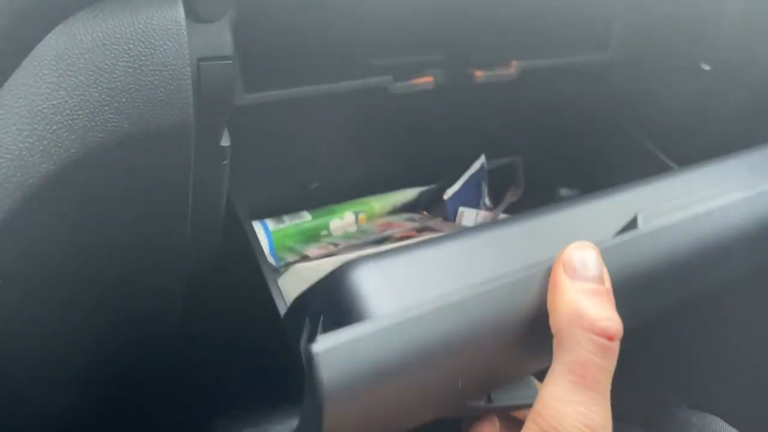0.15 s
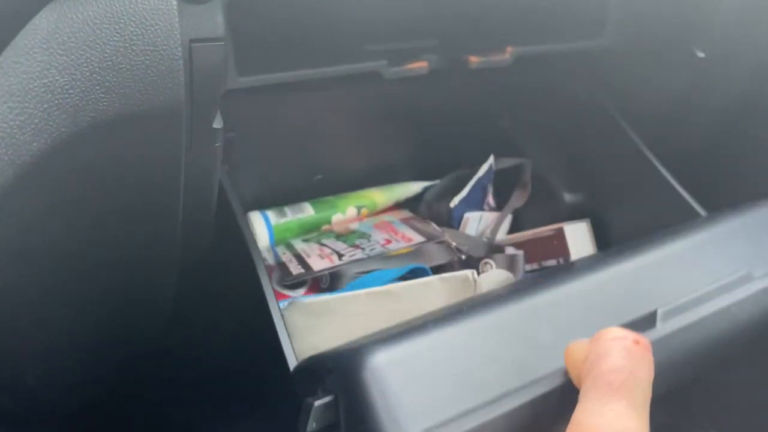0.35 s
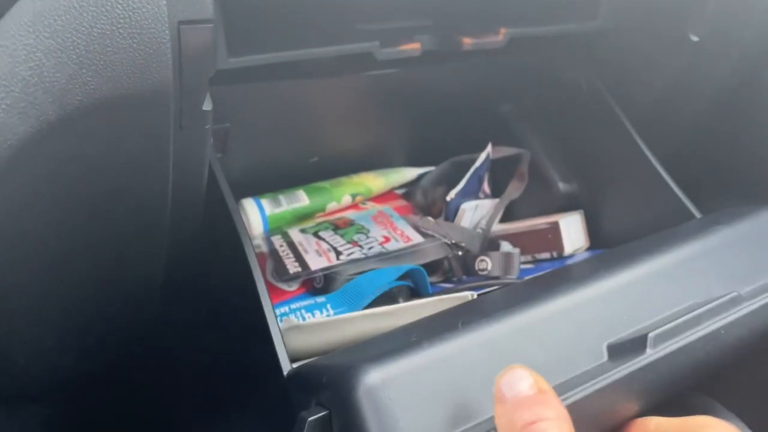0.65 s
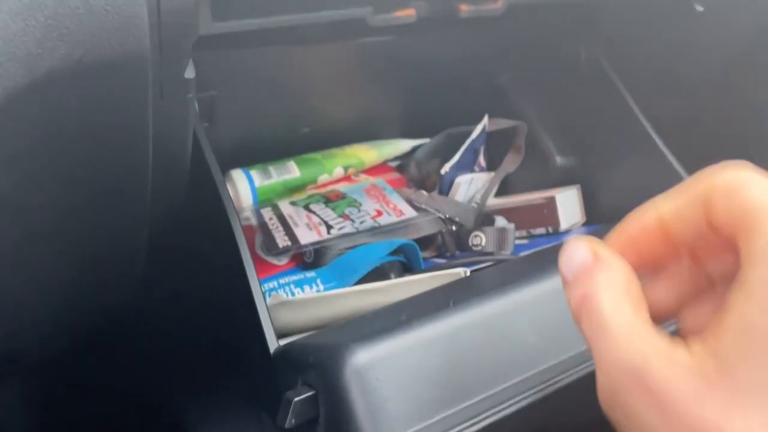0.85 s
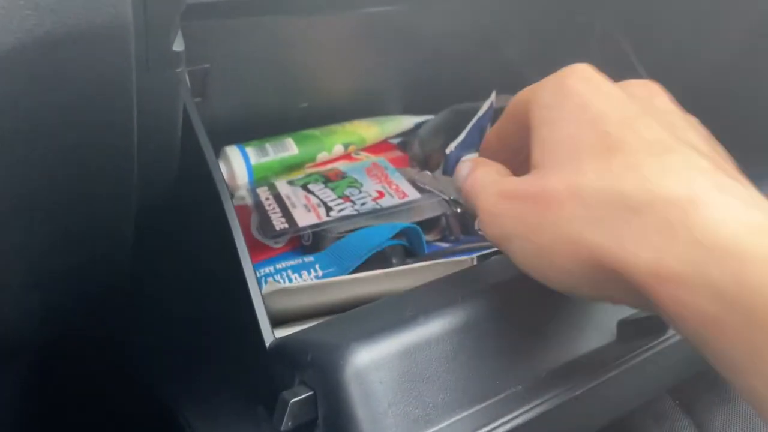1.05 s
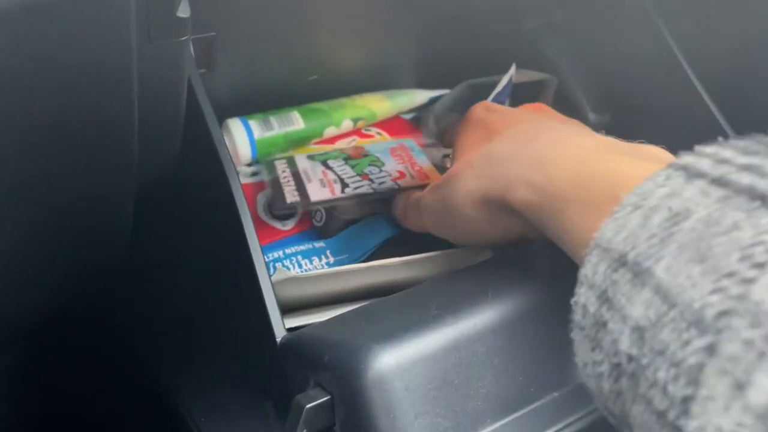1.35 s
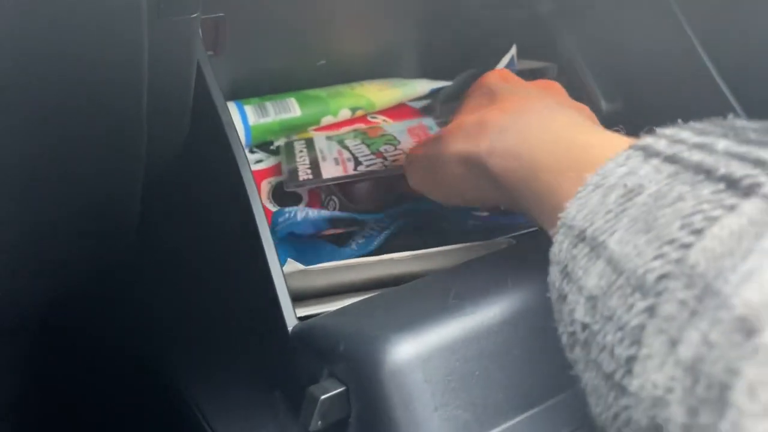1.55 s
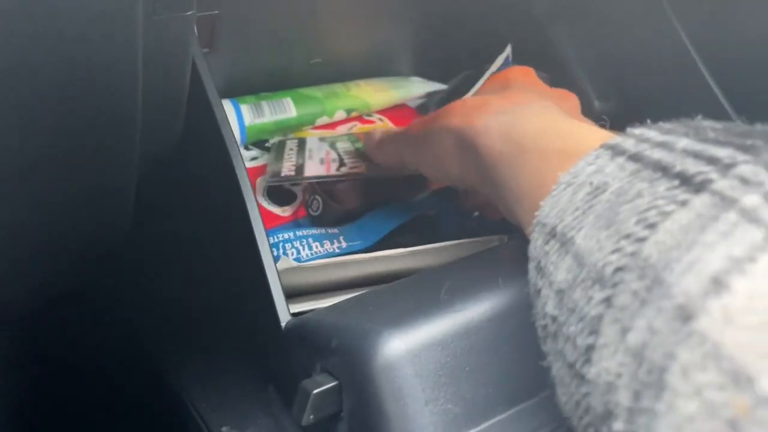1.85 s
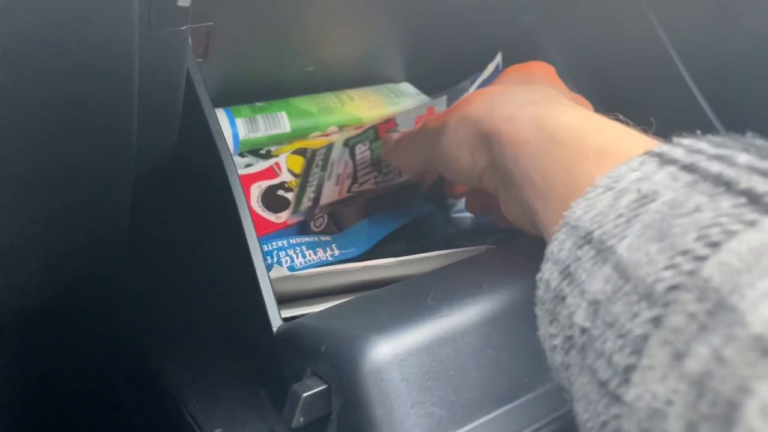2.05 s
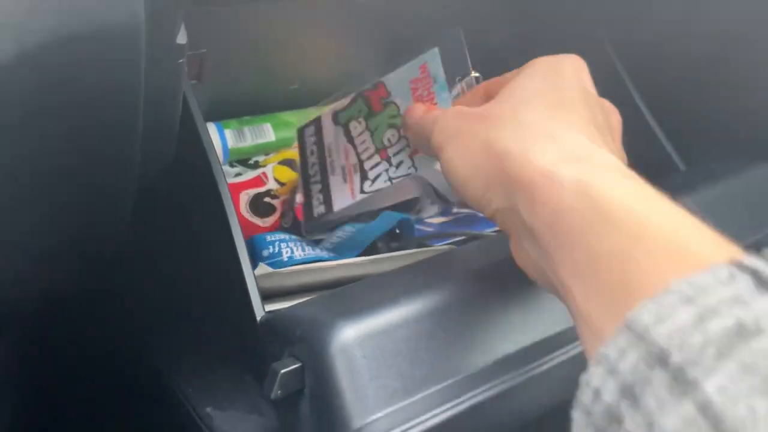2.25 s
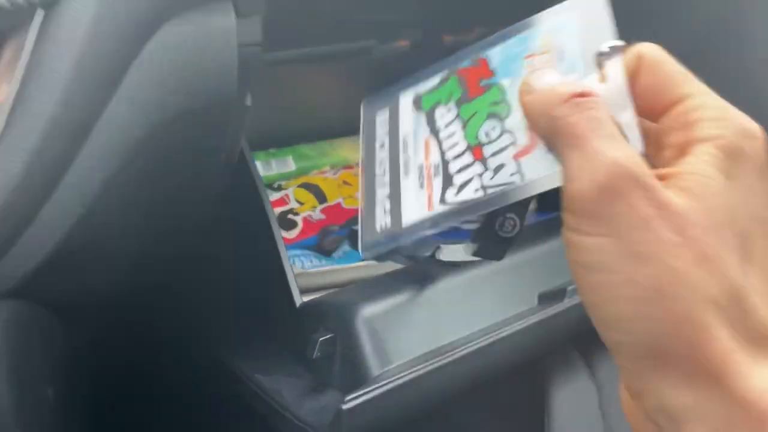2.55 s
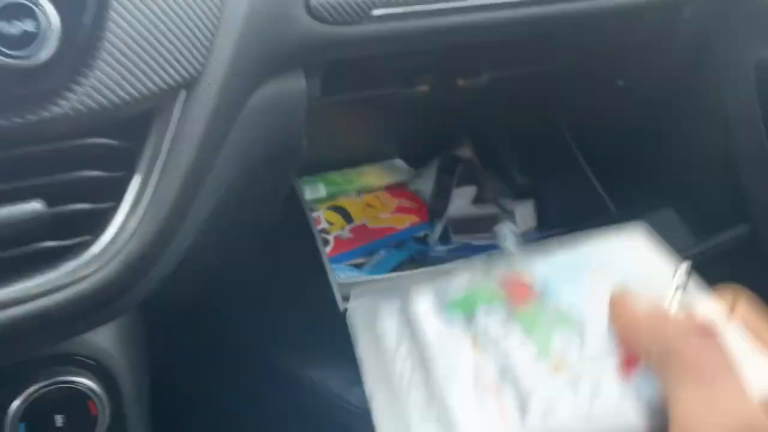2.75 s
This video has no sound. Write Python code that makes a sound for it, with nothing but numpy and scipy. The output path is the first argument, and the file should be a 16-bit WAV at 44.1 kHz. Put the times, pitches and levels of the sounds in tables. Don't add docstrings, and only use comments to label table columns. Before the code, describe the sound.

Inside a damped car cabin, a plastic glove box lid knocks onto its stop and bounces with a dull thump; soft bumps, card slides and crisp snaps follow, heard close over low boom and faint motor hum.

```python
import sys
import numpy as np
from scipy import signal
from scipy.fft import rfft, irfft, next_fast_len
from scipy.io import wavfile
from scipy.ndimage import uniform_filter1d, map_coordinates

SR = 44100
rng = np.random.default_rng(int(sys.argv[2]) if len(sys.argv) > 2 else 0)


def generate_wav(signal):
    frames = np.transpose(np.atleast_2d(signal))
    scaled = np.clip(frames, -1, 1) * 32767
    pcm = np.round(scaled).astype(np.int16)
    wavfile.write(sys.argv[1], SR, pcm)


def amplitude_ratio(level_db):
    exponent = np.asarray(level_db, float) / 20
    return 10 ** exponent


N = 127890


def unit(x):
    return x / np.sqrt(np.mean(x ** 2) + 1e-20)


def along(points, hz):
    f, v = np.transpose(points)
    return np.interp(np.log(hz + 1), np.log(f + 1), v)


def curves(rows):
    s, *cols = np.transpose(rows)
    return [np.interp(np.arange(N) / SR, s, c) for c in cols]


def wobble(rate):
    knots = rng.standard_normal(int(N * rate / SR) + 4)
    return map_coordinates(knots, [np.arange(N) * rate / SR])


def filtered(x, response):
    m = next_fast_len(N + SR // 2)
    return irfft(rfft(x, m) * response(np.fft.rfftfreq(m, 1 / SR)), m)[..., :N]


def coloured(x, response):
    n = x.shape[-1]
    return irfft(rfft(x, 2 * n) * response(np.fft.rfftfreq(2 * n, 1 / SR)))[..., :n]


def add(track, s, sound):
    part = track[..., round(s * SR):][..., :sound.shape[-1]]
    part += sound[..., :part.shape[-1]]


def ring(modes, t):
    partials = sum(amplitude_ratio(db - 60 * t / t60) * np.sin(2 * np.pi * hz * t) for hz, db, t60 in modes)
    return partials * (1 - np.exp(-t / 0.00053))


def peak(f, hz, width):
    return np.exp(-(np.log((f + 1) / hz) / width) ** 2)


def pair(shape):
    common, left, right = rng.standard_normal((3, *shape))
    share = 0.64
    return share ** .5 * common + (1 - share) ** .5 * np.array([left, right])


def dying(decay, length):
    hz, t, z = signal.stft(pair((length,)), SR, nperseg=128)
    return signal.istft(z * amplitude_ratio(-60 * t / along(decay, hz)[:, None]), SR, nperseg=128)[1]


# start in seconds, ring in dB, tilt in dB per octave, crack in dB.
STOP = [
    (.3215, -29.5, 10, -12.5),
    (.3245, -20.5, 2.5, -13.5),
    (.3287, -18.5, -9.5, -20),
    (.4245, -29.5, 2, -23.5),
    (.4285, -29, -9.5, -30),
]
# start in seconds, ring in dB, tilt in dB per octave, crack in dB.
REBOUND = [
    (.4365, -17.5, 0.019, -23),
]
# pitch in Hz, level in dB, t60 in seconds.
LID = [(242, -19.5, 0.034), (383, 6, 0.079), (410, -13, 0.013), (524, 7, 0.042), (622, 3, 0.041),
       (720, 3, 0.045), (973, -3, 0.044), (1150, -1.5, 0.052), (1350, -3.5, 0.025), (1560, -5, 0.044),
       (1923, -2.5, 0.025), (2530, -2, 0.0097)]
# pitch in Hz, level in dB, t60 in seconds.
BIN = [(59.9, -3, 0.27), (79.2, -7.5, 0.63), (117, 4, 0.12), (182, -6, 0.18), (270, -4.5, 0.1),
       (327, -8, 0.18), (356, -2.5, .08)]
# frequency in Hz, level in dB.
CRACK = [(150, -23.5), (600, 4), (2000, -6.5), (4000, -18.5), (8000, -24.5), (16000, -29.5)]
# frequency in Hz, t60 in seconds.
CRACK_DIES = [(400, 0.036), (2000, 0.055), (4000, 0.067), (12000, 0.014)]


def blows(rows, modes, smear):
    out, t = np.zeros((2, N)), np.arange(SR // 3) / SR
    pan_db = -5
    for s, db, tilt_db, crack_db in rows:
        crack = coloured(dying(CRACK_DIES, SR // 6), lambda f: amplitude_ratio(along(CRACK, f)))
        rough = 1 + smear * wobble(305)[:len(t)]
        for ch, side in enumerate((.5, -.5)):
            lean_db = side * pan_db
            add(out[ch], s, amplitude_ratio(crack_db + lean_db) * crack[ch])
            struck = []
            for hz, level, t60 in modes:
                tilt = tilt_db * np.log2(hz / 500)
                struck.append((hz, level + tilt + lean_db * min(hz / 350, 1), t60))
            add(out[ch], s + ch * .0001, amplitude_ratio(db - 4) * ring(struck, t) * rough)
    return out


def lid():
    return blows(STOP, LID, 0.49) + blows(REBOUND, BIN, 0)


# pitch in Hz, level in dB, t60 in seconds.
SQUEAK = [
    (1090, -39.5, 0.066),
    (1310, -41, 0.06),
]


def squeak():
    out, t = np.zeros((2, N)), np.arange(SR // 8) / SR
    add(out, .158, ring(SQUEAK, t) * (1 - np.exp(-t / 0.0011)))
    return ports(out)


# start in seconds, peak in dB, pitch in Hz, t60 in seconds,
# tilt in dB per octave.
TICKS = [(0.1451, -39, 11860, 0.1, -3), (0.1663, -29.5, 1010, 0.0516, -6), (0.2872, -38, 2100, 0.13, -3.5),
         (0.7173, -30.5, 2786, .05, -4), (0.7194, -36, 1310, 0.074, -4.5),
         (1.1571, -33.5, 1236, 0.032, -3.5), (1.1595, -37, 1575, .05, -3), (1.2142, -44.5, 1650, 0.047, 2),
         (1.2736, -42.5, 2240, 0.03, 1.5), (1.318, -40, 1150, 0.05, -7.5),
         (1.3423, -40.5, 4200, 0.084, -9.5), (1.3502, -36, 1090, 0.034, -0.5),
         (1.482, -40.5, 4200, 0.031, -2), (1.533, -57.5, 2680, 0.041, -9), (1.6734, -59, 1350, 0.042, 4),
         (1.8772, -48.5, 980, 0.086, 1), (1.9614, -58, 1960, .05, -5), (1.9664, -34.5, 1530, .05, -4.5),
         (2.077, -35.5, 1110, 0.043, -3), (2.1565, -49.5, 2260, 0.062, -5), (2.374, -30.5, 2750, 0.056, -3),
         (2.3779, -33, 4260, 0.019, 1.5), (2.3938, -27.5, 6560, 0.035, 4), (2.3934, -31, 2730, 0.04, 0),
         (2.4116, -40, 6250, 0.091, 0), (2.45, -48, 6530, 0.019, 1), (2.4547, -47, 3550, 0.047, 2.5),
         (2.575, -43, 2810, 0.069, 2.5), (2.5974, -37.5, 11400, .07, -10),
         (2.6705, -40.5, 4500, 0.026, -1.5), (2.7256, -41.5, 1794, 0.026, 1),
         (2.8364, -51.5, 2820, 0.062, 1.5), (2.8753, -46, 11400, 0.045, 2), (2.8914, -27.5, 5990, 0.033, 1)]
# frequency in Hz, level in dB.
SNAP = [(300, 5.5), (1500, 3), (6000, -2.5), (12000, -6), (16000, -13.5)]


def ticks():
    out, t = np.zeros((2, N)), np.arange(SR // 8) / SR
    rise = 1 - np.exp(-t / 0.0012)
    spike = 1 + amplitude_ratio(-8) * np.exp(-t / 0.0027)
    for s, db, hz, t60, tilt_db in TICKS:
        def shape(f):
            tilt = tilt_db * np.log2((f + 1) / 2500)
            return amplitude_ratio(along(SNAP, f) + tilt + 9 * peak(f, hz, 0.24))
        burst = amplitude_ratio(-60 * t / t60) * spike * unit(coloured(pair(t.shape), shape))
        tone = ring([(hz, -13, t60)], t)
        add(out, s, amplitude_ratio(db - 3) * rise * (burst + tone))
    return ports(out)


# start in seconds, peak in dB, low mode in Hz, high mode in Hz,
# high over low in dB.
BUMPS = [(.042, -51, 332, 530, -16), (.599, -41, 334, 577, 4), (.954, -45.5, 198.3, 260, 10.5),
         (1.161, -46, 405, 1235, 0), (1.345, -45, 407, 670, -4), (1.382, -37.5, 216, 450, -1),
         (1.465, -44, 195, 260, -14), (1.671, -54.5, 653, 1105, 5), (1.771, -61, 780, 980, 1),
         (1.815, -57, 790, 1000, 2), (1.884, -53.5, 730, 495, -1), (1.961, -52.5, 650, 990, -13),
         (1.978, -49.5, 800, 600, 4), (2.185, -66, 785, 1100, 9), (2.394, -48.5, 337, 680, 11),
         (2.449, -51, 550, 720, -15)]


def bumps():
    out, t = np.zeros((2, N)), np.arange(SR // 8) / SR
    t60 = 0.074
    for s, db, hz, high_hz, high_db in BUMPS:
        modes = [(hz, 0, t60), (high_hz, high_db, t60 * 0.38)]
        puff = unit(coloured(pair(t.shape), lambda f: f / hz / (1 + (f / (1.09 * high_hz)) ** 4)))
        puff = puff * amplitude_ratio(-3 - 75 * t / t60)
        add(out, s, amplitude_ratio(db + 5) * (ring(modes, t) + puff) * (1 - np.exp(-t / 0.0009)))
    return ports(out)


# centre in seconds, half length in seconds, level in dB,
# resonance in Hz, its width in log Hz.
STROKES = [(0.405, 0.035, -63.5, 2200, 0.45), (0.477, 0.029, -54.5, 960, 0.67),
           (0.554, 0.022, -62.5, 5270, .3), (0.679, 0.044, -59.5, 2500, 0.18),
           (1.268, 0.028, -55.5, 11600, 0.12), (1.423, 0.022, -61.5, 3500, 0.41),
           (1.588, 0.031, -63, 3500, 0.14), (1.894, 0.008, -61, 4530, .3), (2.117, 0.069, -68, 2450, 0.1),
           (2.19, 0.051, -57, 3000, .1), (2.203, 0.04, -62, 10200, .2), (2.314, 0.033, -65, 5500, 0.3),
           (2.588, 0.015, -70.5, 14000, 0.14), (2.733, 0.048, -56.5, 5940, 0.33),
           (2.769, 0.036, -60, 10900, 0.39)]
# frequency in Hz, level in dB per Hz.
RUSTLE = [(150, -18), (400, -2.5), (1000, -8.5), (2000, -11.5), (4500, -15), (9000, -22), (13000, -20),
          (15000, -18.5)]


def strokes():
    out = np.zeros((2, N))
    t = np.arange(SR // 4) / SR - 1 / 8
    for s, half, db, hz, width in STROKES:
        hiss = coloured(pair(t.shape), lambda f: amplitude_ratio(along(RUSTLE, f) + 13 * peak(f, hz, width)))
        add(out, s + t[0], amplitude_ratio(db) * np.exp(-(t / half) ** 2) * unit(hiss))
    return ports(out)


# time in seconds, level in dB.
HAND = [(0, -72), (.16, -60.5), (.37, -59.5), (.43, -47), (.6, -64.5), (.69, -53.5), (.84, -80),
        (1.14, -66), (1.27, -54), (1.5, -58), (1.72, -69), (1.865, -65), (1.88, -60), (2.17, -62),
        (2.3, -63.5), (2.5, -63), (2.76, -57), (2.79, -66)]


def rustle():
    db, = curves(HAND)
    grain_db = 3.5 * np.minimum(rng.exponential(size=N), 3)
    sparks = (rng.random(N) < 110 / SR) * amplitude_ratio(grain_db)
    grains = unit(np.convolve(sparks, np.exp(-np.arange(500) / 110))[:N])
    z = signal.stft(pair((N,)), nperseg=256)[2]
    patches = uniform_filter1d(rng.standard_normal(z.shape[1:]), size=3, axis=0)
    patches = uniform_filter1d(patches, size=5, axis=1)
    hiss = signal.istft(z * amplitude_ratio(2 * unit(patches)), nperseg=256)[1][:, :N]
    hiss = unit(filtered(hiss, lambda f: amplitude_ratio(along(RUSTLE, f))))
    flutter_db = 1.5 * wobble(25.63)
    return ports(amplitude_ratio(db + flutter_db) * (1 + amplitude_ratio(-9) * grains) * hiss)


# frequency in Hz, t60 in seconds.
CABIN = [(200, 0.095), (2000, 0.032), (10000, 0.054)]


def cabin(x):
    tail = dying(CABIN, SR // 4)
    return signal.fftconvolve(x, tail / np.linalg.norm(tail[0]), axes=1)[:, :N]


# centre in seconds, half width in seconds, level in dB.
BOOM = [(.07, 0.023, -38.5), (0.297, 0.071, -28.5), (0.474, 0.067, -28), (0.698, 0.043, -34.5),
        (.93, 0.031, -41), (1.037, 0.07, -29.5), (1.192, 0.013, -31), (1.458, 0.054, -33),
        (1.66, 0.036, -41), (1.82, 0.074, -27), (1.979, 0.019, -36.5), (2.08, 0.03, -38.5),
        (2.21, 0.073, -36.5), (2.42, 0.037, -39.5), (2.546, 0.039, -26.5), (2.639, 0.03, -31),
        (2.74, 0.027, -42), (2.9, 0.017, -39)]
# time in seconds, pitch in Hz.
BOOM_HZ = [(0.0, 51.02), (0.19, 48.83), (0.44, 64.68), (0.57, 62.12), (0.65, 56.69), (0.93, 54.43),
           (1.19, 54.25), (1.26, 57.4), (1.57, 57.83), (1.68, 51.1), (2.01, 52.47), (2.11, 57.05),
           (2.24, 53.9), (2.39, 54.35), (2.49, 54.9), (2.66, 55.2), (2.79, 41.5), (2.9, 42)]


def boom():
    t = np.arange(N) / SR
    swell = amplitude_ratio(-44.5) + sum(amplitude_ratio(db - 1) * np.exp(-((t - s) / half) ** 2) for s, half, db in BOOM)
    hz, = curves(BOOM_HZ)
    level = swell * amplitude_ratio(.4 * wobble(9.4))
    return level * np.sin(2 * np.pi * np.cumsum(hz) / SR + .3 * wobble(9.5))


# time in seconds, pitch in Hz, fundamental in dB, octave in dB.
MOTOR = [(0, 117.9, -39.5, -56.5), (.5, 117, -38.5, -53), (1.0, 116.1, -37, -63), (1.25, 116.9, -54, -59.5),
         (1.7, 121, -61.5, -61.5), (2.05, 124, -43.5, -58.5), (2.5, 124, -48, -60), (2.9, 124.2, -82, -52)]


def motor():
    hz, low_db, high_db = curves(MOTOR)
    turn = 2 * np.pi * np.cumsum(hz) / SR + 0.13 * wobble(3.0)
    low = amplitude_ratio(low_db - 2.5 + 2.7 * wobble(6.62)) * np.sin(turn)
    octave = amplitude_ratio(high_db + 2 + 2.0 * wobble(9.79)) * np.sin(2 * turn)
    return low + octave


# frequency in Hz, level in dB per Hz.
AIR = [(25, -37), (55, -4.5), (90, -7), (230, -16.5), (600, -33.5), (2000, -44.5), (7000, -63.5),
       (16000, -71.5)]
# frequency in Hz, left-right likeness from 0 to 1.
AIR_ALIKE = [(100, 0.89), (350, 0.69), (1400, 0.16)]


def air():
    def spread(f):
        angle = np.arccos(np.clip(along(AIR_ALIKE, f), -1, 1)) / 2
        return amplitude_ratio(along(AIR, f)) * [np.cos(angle), np.sin(angle)]
    mid, side = filtered(rng.standard_normal((2, N)), spread)
    return amplitude_ratio(-49) * unit(np.array([mid + side, mid - side]))


def hum():
    return level_pair(boom() + motor()) + air()


def level_pair(x):
    return x * amplitude_ratio([[.4], [-.4]])


# frequency in Hz, left over right in dB.
LEAN = [(300, -2), (800, -5.5), (5500, -2), (8000, -0.5)]


def ports(x):
    return filtered(x, lambda hz: [amplitude_ratio(k * along(LEAN, hz)) * np.exp(-.6j * k) for k in (.5, -.5)])


# frequency in Hz,
# level in dB.
SUM = [(6800, 0), (7400, -38), (8600, -38), (9100, 0), (13100, 0), (13700, -40), (14700, -40), (15300, -30),
       (16000, -40)]
# frequency
# in Hz, level in dB.
DIFFERENCE = [(500, 2.5), (1500, 4.5), (3000, -2), (6300, 6), (7300, 13.5), (9900, 8), (10600, -28.5),
              (12100, -30), (12900, 4.5)]


def thinned(x, depth):
    mid = filtered(x[0] + x[1], lambda f: amplitude_ratio(depth * along(SUM, f))) / 2
    side = filtered(x[0] - x[1], lambda f: amplitude_ratio(depth * along(DIFFERENCE, f))) / 2
    return np.array([mid + side, mid - side])


def scene():
    hits = lid() + squeak() + ticks() + bumps()
    around = strokes() + rustle() + amplitude_ratio(-7) * cabin(hits) + hum()
    return thinned(hits, .42) + thinned(around, 0.67)


def low_pass(x):
    return signal.sosfilt(signal.butter(12, 16500, fs=SR, output="sos"), x)


def record(dry):
    return low_pass(dry)


dry = scene()
out = record(dry)
generate_wav(out)
```